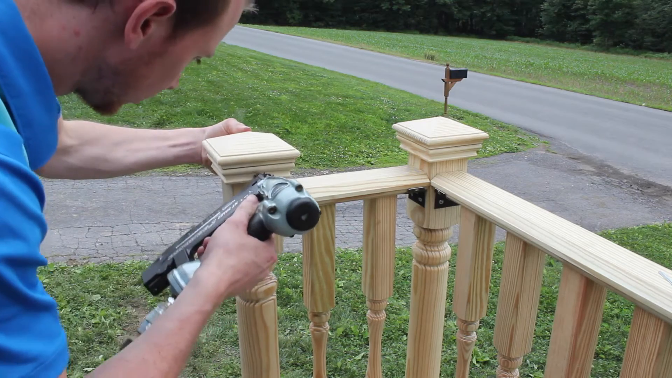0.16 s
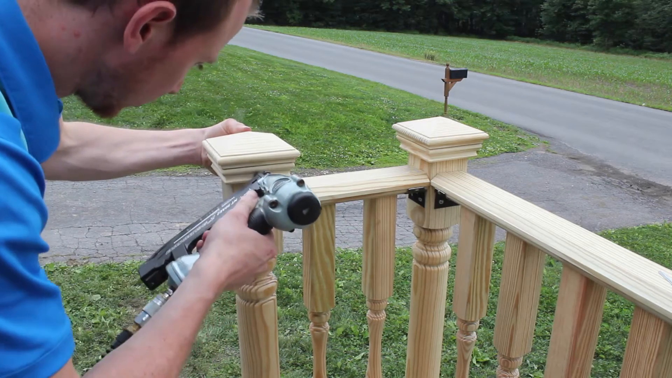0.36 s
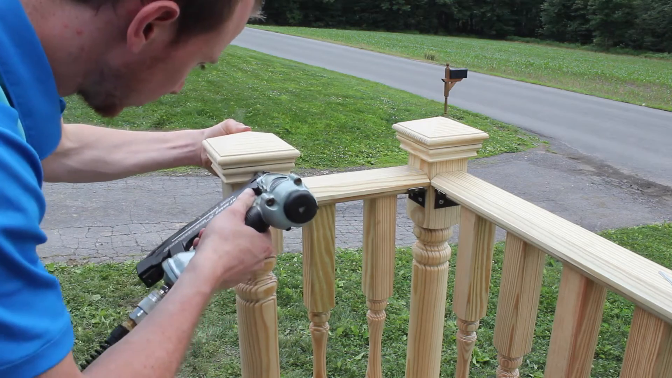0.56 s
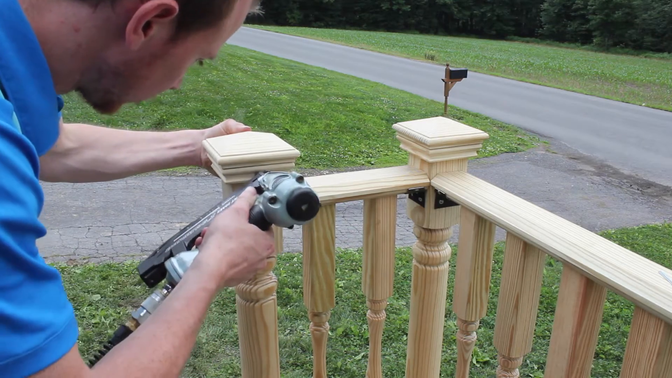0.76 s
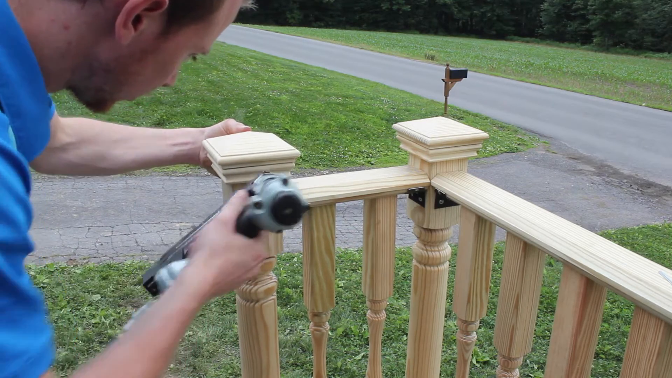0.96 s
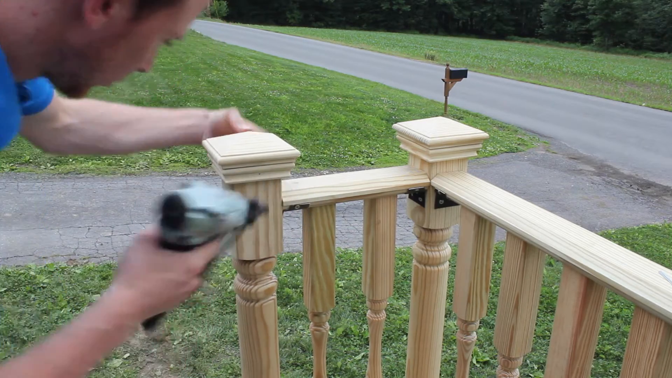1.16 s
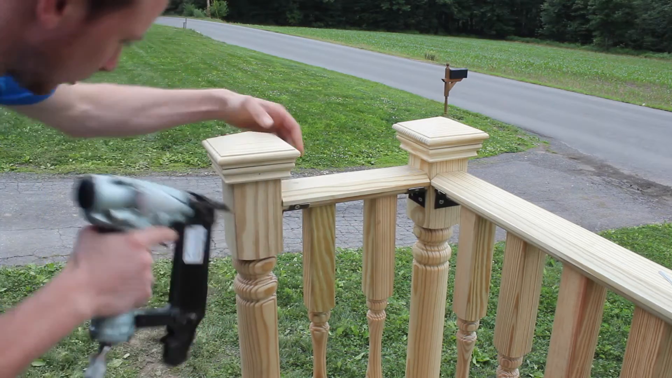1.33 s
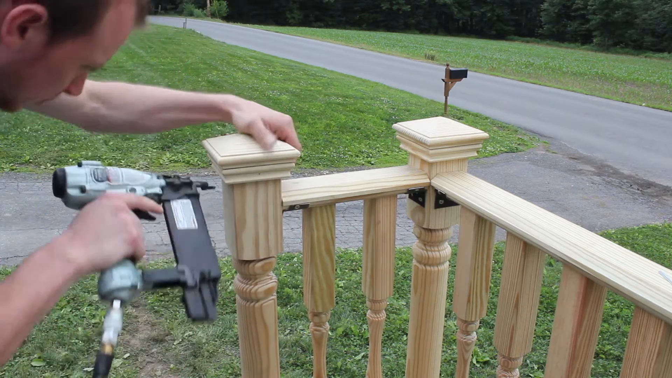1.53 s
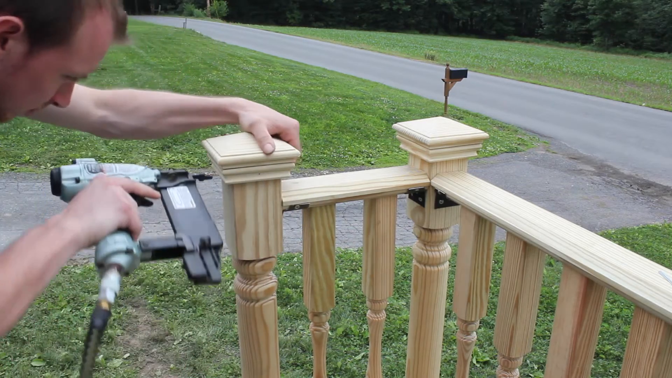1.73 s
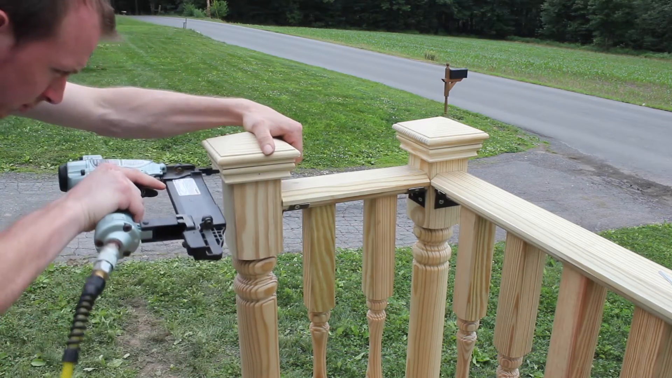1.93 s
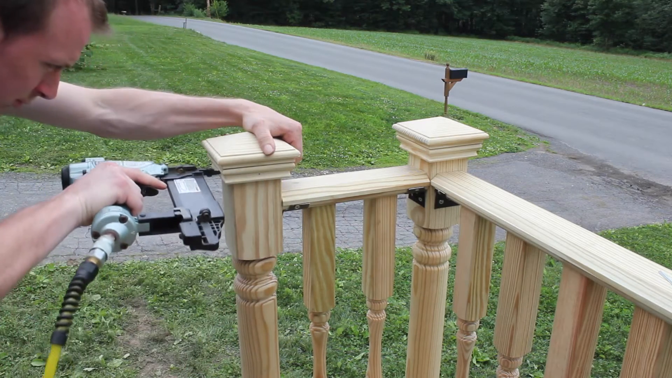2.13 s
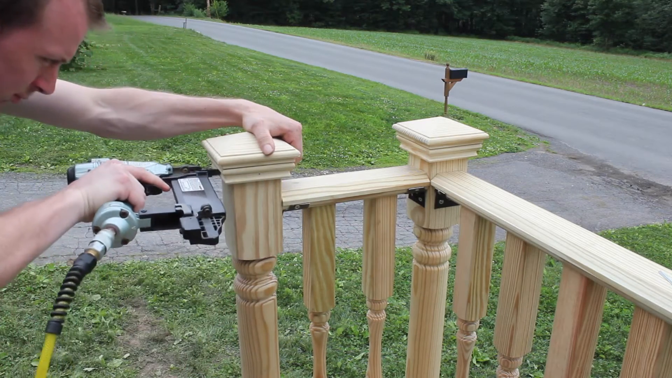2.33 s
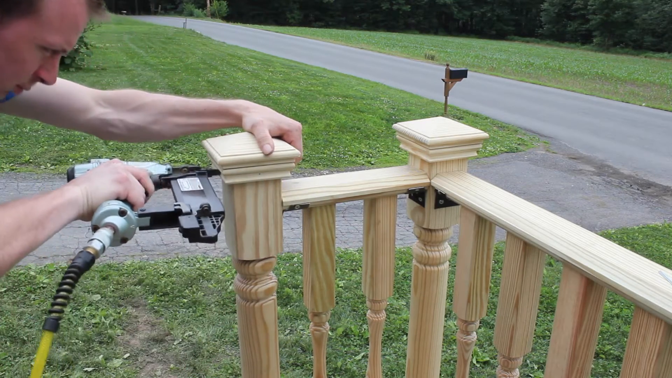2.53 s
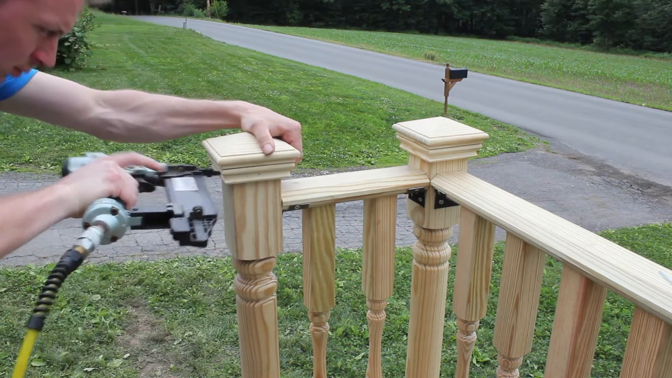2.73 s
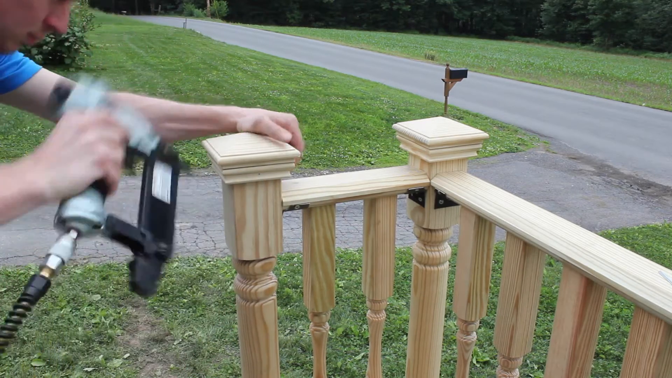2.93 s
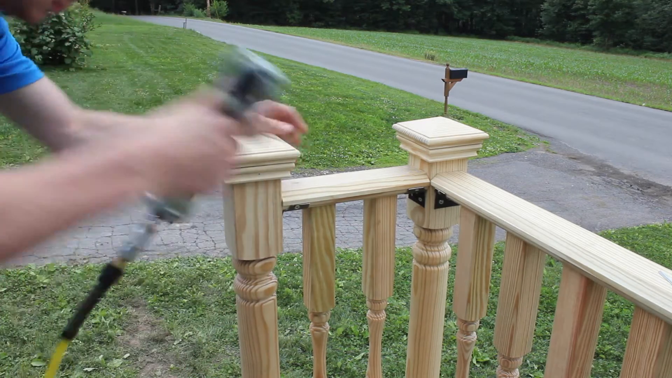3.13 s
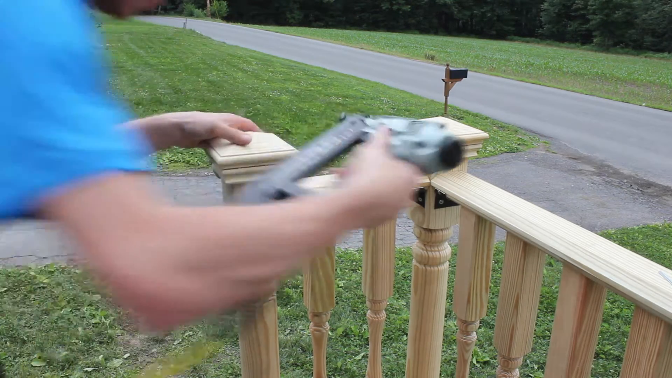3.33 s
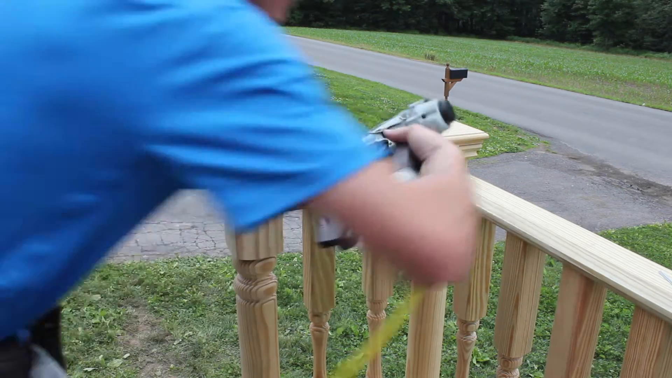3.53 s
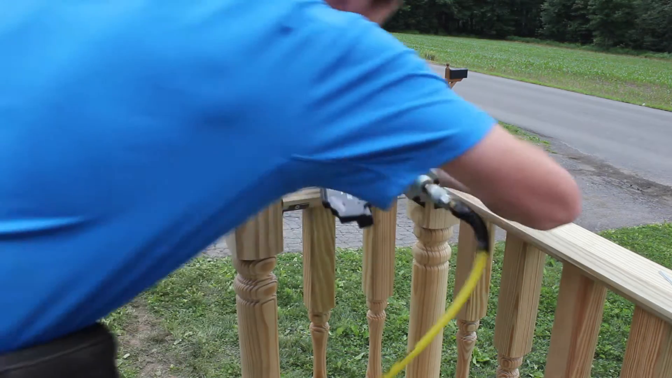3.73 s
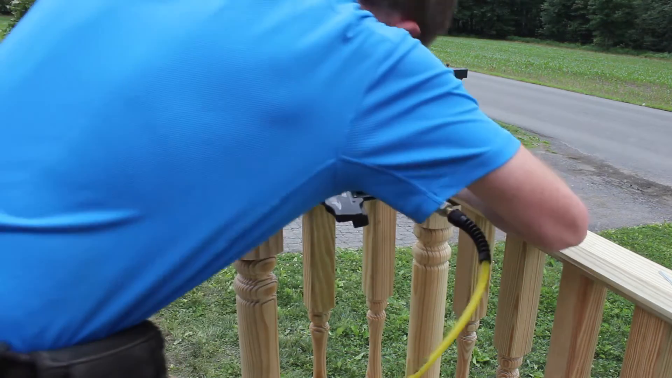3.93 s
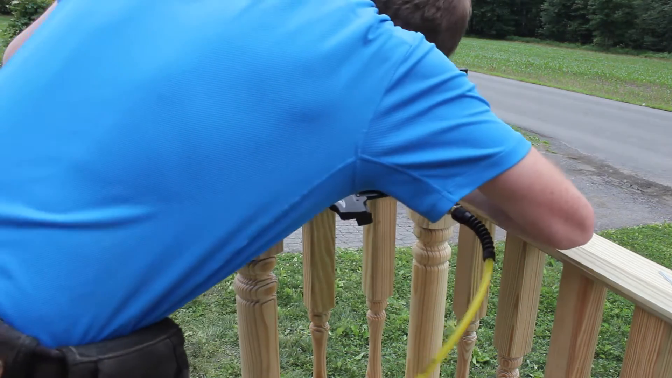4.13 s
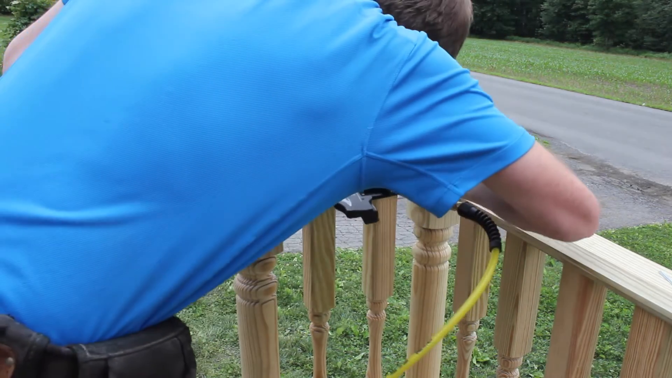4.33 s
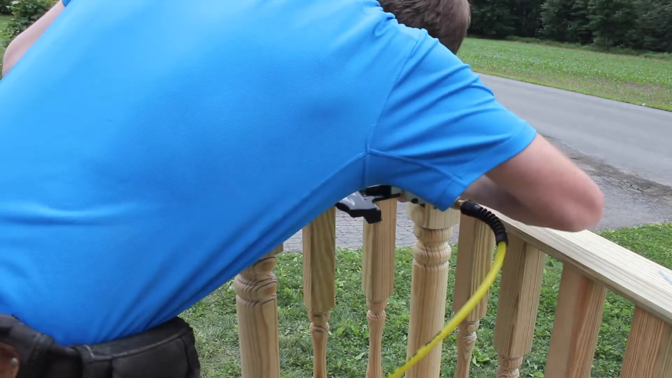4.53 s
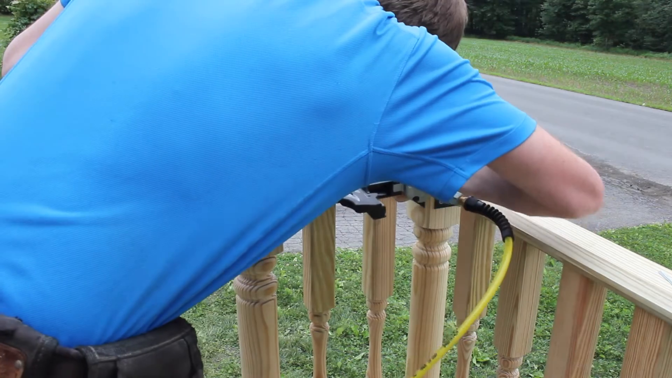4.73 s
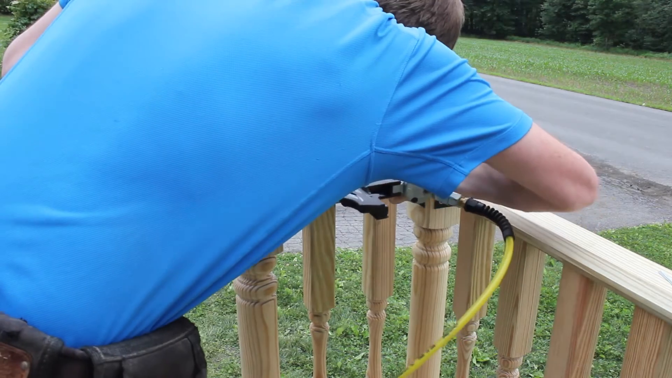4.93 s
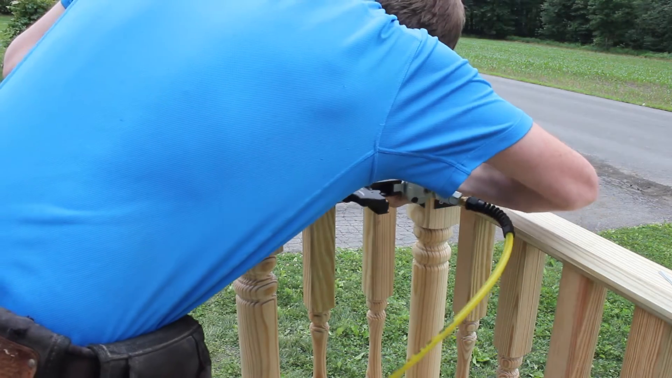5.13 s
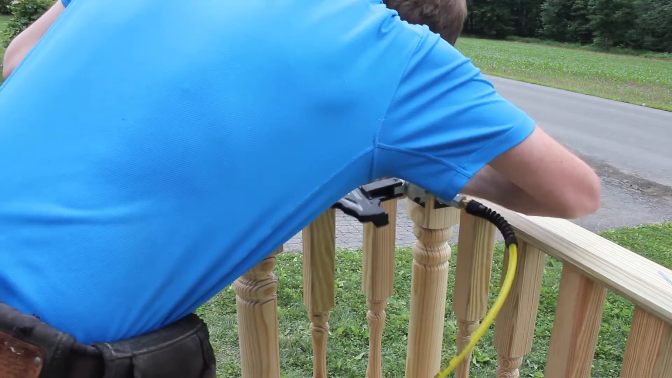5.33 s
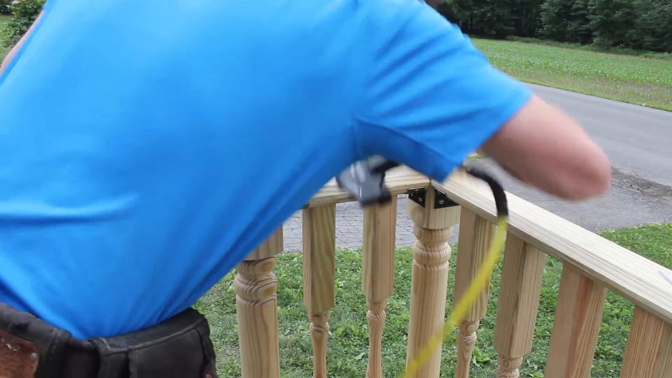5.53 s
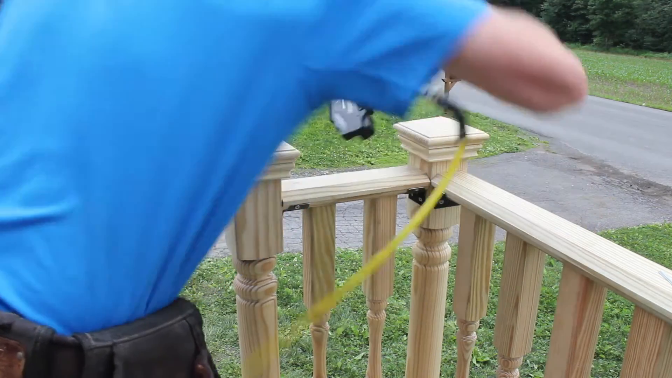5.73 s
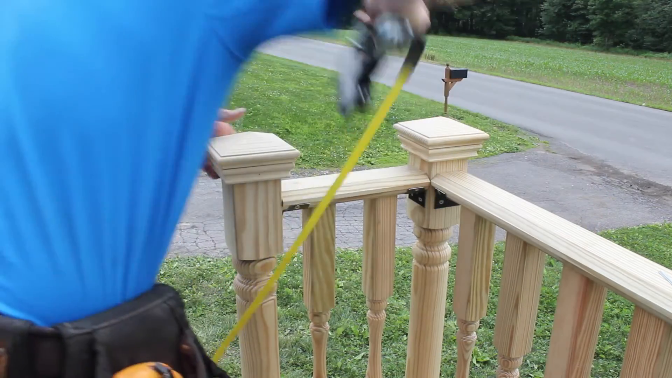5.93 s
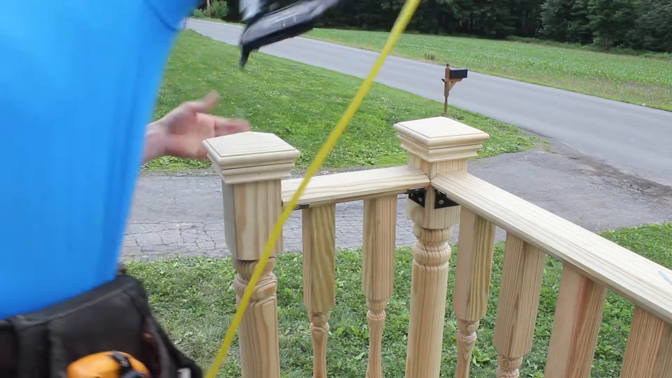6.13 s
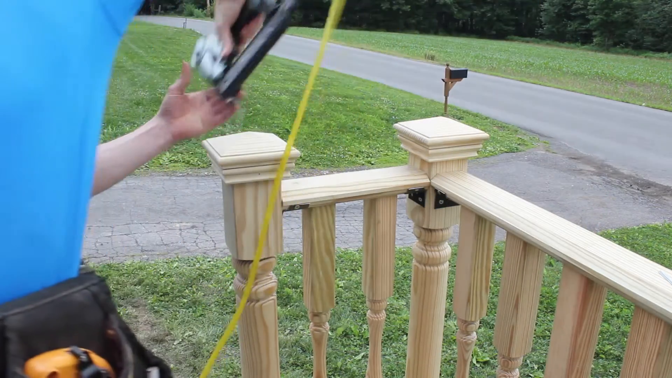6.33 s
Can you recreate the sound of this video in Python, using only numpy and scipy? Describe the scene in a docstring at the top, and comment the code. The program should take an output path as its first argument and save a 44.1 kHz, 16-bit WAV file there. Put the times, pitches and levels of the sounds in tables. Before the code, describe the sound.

Outdoors on a wooden porch, close and mono. Small clicks, a short squeak near 0.27 s and light scuffs open over barely audible leaves and low rumble. A puff of air at 0.78 leads to a very loud, dry crack at 0.87, with blast and thud, thin hiss and a valve clack at 1.0. From 1.15 to 1.35 the tool clicks, bumps and drags with a brief metallic ringing; fine clicks and scuffs follow at 1.9-2.4. The second, loudest shot cracks at 2.7, hissing out by 2.9. Light handling resumes at 3.2; a solid wooden knock lands at 3.8, a sharp click at 4.0, and smaller clicks at 4.6. A puff at 5.2 precedes the third shot at 5.3, with a heavier thud and clack at 5.46. Cloth brushes, a click at 5.94 and faint scuffs end it. Background dips after every shot.

```python
"""On a wooden porch outdoors, close to the microphone, a pneumatic stapler fixes trim to the rail.
Each of three shots joins a puff of air, the crack of the driver, a blast, a thud in the wood,
a hiss of exhaust and a valve clack: shaped noise, a short burst of sine and ringing modes.
Between shots the tool is shifted: it clicks, scuffs, squeaks, drags and bumps the rail.
Behind it lie a quiet garden and a low rumble; they and the low end of the shots dip after each shot."""
import sys
import numpy as np
from scipy import signal
from scipy.fft import rfft, irfft
from scipy.io import wavfile
from scipy.ndimage import uniform_filter1d

SR = 44100
rng = np.random.default_rng(int(sys.argv[2]) if len(sys.argv) > 2 else 0)


def materialize(psi):
    """Save the field psi as 16-bit PCM at rate SR to the path in sys.argv[1].

    A 1-D psi becomes a single channel; in a 2-D psi each row is a channel.
    """
    bounded = np.clip(np.atleast_2d(psi).T, -1, 1)
    quanta = np.round(bounded * 32767).astype(np.int16)
    wavfile.write(sys.argv[1], SR, quanta)


N = 285327
TOP_HZ = 15750  # upper limit of the recorded band
TIME = np.arange(N) / SR
AGE = TIME[:SR // 2]  # seconds since the start of one event

# The shots. Each row: start in seconds, crack level in dB, crack pitch in Hz, blast peak in seconds
# after the start, blast level in dB, thud in seconds after the start, thud level in dB,
# exhaust level in dB, exhaust length in seconds.
SHOT_ROWS = [(0.8747, -5, 2480, 0.025, -9.5, 0.028, -20, -32, 0.18),
             (2.7143, -2.5, 2564, 0.027, -10.5, 0.025, -21, -29.5, 0.17),
             (5.2923, -7.5, 2910, 0.025, -12.5, .0290, -13, -32.5, 0.17)]
# Ringing modes of the metal magazine. Each row: pitch in Hz, level in dB, 60 dB decay in seconds.
MAGAZINE_MODES = [(986.5, -6, 0.2), (1320, -16.5, 0.071), (1880, -11.5, 0.14), (2030, -7, 0.089),
                  (2410, -9.5, .17), (2650, -1.5, 0.28), (3010, -4, 0.16), (3720, -17, 0.38),
                  (4650, -9.5, 0.18), (4620, 2, 0.037), (6060, -14.5, 0.1), (8180, -13, 0.061),
                  (8850, -8, 0.037), (10280, -13.5, 0.053), (11730, -10.5, 0.031), (13550, -12, 0.046),
                  (14900, -65, 0.068)]
# Ringing modes of the wooden rail, before extra damping. Each row: pitch in Hz, level in dB,
# 60 dB decay in seconds.
RAIL_MODES = [(122.4, -9.5, 0.17), (232, -19.5, 0.037), (340, -3.5, 0.027), (430, -14.5, 0.17),
              (539, 1, 0.062), (607, -4, 0.18), (715, -7, 0.11), (830, -2, .06), (930, 0, 0.066),
              (1228, -3, 0.061), (1485, -5, 0.011), (1980, -16.5, 0.031)]
# Colour of rushing air. Each row: frequency in Hz, relative level in dB per Hz.
PUFF_COLOUR = [(60, -27.5), (200, -16), (600, -2), (1500, 0), (2800, 2), (5000, -2.5), (9000, -4),
               (15500, -4.5)]
# Colour of a blow on wood. Each row: frequency in Hz, relative level in dB per Hz.
THUD_COLOUR = [(60, -41.5), (180, -27.5), (330, -2.5), (550, -5), (1000, 6), (2400, 3), (4000, -13),
               (8000, -13), (15500, -20.5)]
# Colour of sliding contact. Each row: frequency in Hz, relative level in dB per Hz.
SCUFF_COLOUR = [(80, -62), (400, -38), (800, 0), (1700, 6.5), (2800, 5), (5000, -5.5), (8000, -12),
                (13000, -18), (15500, -22.5)]
# Colour of a bright tick. Each row: frequency in Hz, relative level in dB per Hz.
TICK_COLOUR = [(100, -32), (600, -18.5), (1400, 5.5), (3000, 1.5), (7500, 7.5), (10000, -2), (15500, -11.5)]
# Colour of the echoes, also of brushed cloth. Each row: frequency in Hz, relative level in dB per Hz.
ECHO_COLOUR = [(100, -19), (400, -11), (1000, -3), (2000, -6), (4000, -6), (8000, -5.5), (15500, -16)]


def stapler():
    """Three firing cycles: air arms the tool, the driver strikes, the cylinder vents, the valve shuts."""
    # Air puffs as the tool is armed. Each row: approximate peak in seconds, level in dB,
    # tilt in dB per octave.
    arming = [(0.775, -22.5, 1), (2.613, -24, 0), (5.203, -26, -0.5)]
    # The head valve shuts. Each row: start in seconds, level in dB.
    valve_shuts = [(1.011, -30.5), (2.818, -34), (5.457, -28)]
    out = np.zeros(N)
    for s, db, tilt_db in arming:
        add(out, s - 0.03, undb(db) * puff(tilt_db))
    for s, crack_db, hz, blast_s, blast_db, thud_s, thud_db, hiss_db, length_s in SHOT_ROWS:
        add(out, s, undb(crack_db) * crack(hz))
        add(out, s, undb(blast_db) * blast(blast_s))
        add(out, s, undb(hiss_db) * exhaust(length_s))
        add(out, s + thud_s, undb(thud_db) * thud())
    for s, db in valve_shuts:
        add(out, s, undb(db) * valve())
    return out


def crack(hz, push_s=0.00036, housing_db=-13, snap_db=-15):
    """The driver slams down: a few violent cycles, then the housing rings."""
    # Modes of the stapler housing. Each row: pitch in Hz, level in dB, 60 dB decay in seconds.
    housing_modes = [(1470, 4.5, 0.013), (2230, -9, 0.0047), (3050, 1.5, .016), (4170, -18.5, 0.0061)]
    push = AGE / push_s * np.exp(1 - AGE / push_s)
    cycles = push * (undb(snap_db) * noise(TICK_COLOUR) - np.sin(2 * np.pi * hz * AGE))
    housing = crest(ring(signal.unit_impulse(len(AGE)), housing_modes))
    onset = 1 - np.exp(-AGE / push_s)
    return cycles - undb(housing_db) * housing * onset


def blast(peak_s, leak_db=-17):
    """Air escapes ever faster while the piston travels, and stops when it seats, but for a fading leak."""
    # Colour of the blast. Each row: frequency in Hz, relative level in dB per Hz.
    blast_colour = [(60, -37), (300, -15), (700, -2), (2000, -6), (5000, -2.5), (9500, 1.5), (15500, 1)]
    flow = np.minimum(1.01 * swell(peak_s, 0.012, 0.0054), 1)
    leak = undb(leak_db) * noise(PUFF_COLOUR) * fade(0.03, peak_s)
    return noise(blast_colour, ripple_db=2) * flow + leak


def thud(wood_db=-12, seat_db=1, low_hz=340):
    """The piston bottoms out with a snap and the recoil shakes the wood; the lows are filtered out."""
    blow = noise(THUD_COLOUR, ripple_db=1) * fade(0.046)
    seat = undb(seat_db) * noise(PUFF_COLOUR) * fade(0.0016)
    wood = undb(wood_db) * crest(ring(signal.unit_impulse(len(AGE)), RAIL_MODES) * fade(0.08))
    return filtered(crest(blow) + seat + wood, low_hz, "high")


def exhaust(length_s, sag_db=-28, thin_t60=0.15, thin_hz=2800):
    """The cylinder vents; the hiss thins as the pressure falls, then closes (sag in dB per second)."""
    # Colour of the exhaust hiss. Each row: frequency in Hz, relative level in dB per Hz.
    exhaust_colour = [(60, -44.5), (300, -41.5), (600, -23.5), (1000, -25.5), (2000, -14.5), (4000, -8),
                      (7000, 0.5), (10000, -1.5), (13000, 4.5), (15500, -3.5)]
    full, thin = (noise(exhaust_colour, ripple_db=1.5) for _ in range(2))
    pressure = fade(thin_t60)
    hiss = pressure * full + (1 - pressure) * filtered(thin, thin_hz, "high")
    opening = np.minimum(AGE / 0.025, 1)
    return hiss * undb(sag_db * AGE) * fade(0.1, length_s) * opening


def puff(tilt_db, lead_s=0.031, width_s=0.014, linger_db=-15, fill_db=-27):
    """Air rushes through the trigger valve, then trickles on until the shot."""
    rush = np.exp(-((AGE - lead_s) / width_s) ** 2 / 2)
    flow = rush + undb(linger_db) * fade(0.041, lead_s)
    opening = np.minimum(1, np.exp((AGE - lead_s + 0.0135) / 0.002))
    trickle = undb(fill_db) * noise(SCUFF_COLOUR) * fade(0.1, 0.13)
    return (noise(PUFF_COLOUR, tilt_db, ripple_db=2) * flow + trickle) * opening


def valve(bounce_s=0.0039):
    """The piston returns and the head valve shuts with a short double clack."""
    # Colour of the valve clack. Each row: frequency in Hz, relative level in dB per Hz.
    valve_colour = [(300, -125), (900, -17.5), (1800, -4.5), (3000, -4), (5500, -6.5), (9000, -11.5),
                    (15500, -24)]
    bounce = undb(-18.5) * (AGE > bounce_s) * fade(0.037, bounce_s)
    onset = 1 - np.exp(-AGE / 0.00087)
    return noise(valve_colour, ripple_db=4) * (fade(0.081) + bounce) * onset


def bumps(contact_db=-1, scrape_db=-22, firm=0.35, damping=30, tail_db=-24):
    """The tool bumps the rail: noisy contact and a knock ring the wood; shorter swells damp it sooner."""
    # Bumps against the rail. Each row: peak in seconds, level in dB, swell length scale in seconds,
    # low-pass corner in Hz.
    rail_contacts = [(0.339, -43.5, 0.01, 2000), (1.148, -35.5, 0.0056, 703), (1.166, -31.5, .02, 600),
                     (1.325, -37, .016, 230), (1.738, -47, 0.0062, 1500), (3.314, -49, .01, 349),
                     (3.768, -37, 0.0023, 990), (3.791, -21, 0.0062, 1402), (3.799, -18, 0.011, 480),
                     (3.830, -28, 0.02, 260), (3.884, -46, .015, 1200), (3.934, -34.5, .011, 1200),
                     (5.818, -57.5, 0.0039, 817), (5.999, -49, .008, 1800), (6.408, -45, 0.014, 1770)]
    out = np.zeros(N)
    for s, db, swell_s, hz in rail_contacts:
        lead_s = 0.97 * swell_s
        tail = undb(tail_db) * (AGE > lead_s) * fade(0.25, lead_s)
        rise = swell(lead_s, 1.1 * swell_s, 0.0066) + tail
        contact = filtered(noise(THUD_COLOUR) * rise, 200, "high")
        knock = firm * np.exp(-((AGE - lead_s) / 0.00005) ** 2)
        force = contact / np.linalg.norm(contact) + knock
        wood = filtered(ring(force, RAIL_MODES), 160, "high") * fade(damping * swell_s, lead_s)
        body = crest(wood) + undb(contact_db) * crest(contact)
        scrape = undb(scrape_db) * noise(SCUFF_COLOUR) * rise
        add(out, s - lead_s, undb(db) * (crest(filtered(body, hz, "low")) + scrape))
    return out


def clicks(spread=1.22, metal_db=-33, t60=0.027, bounce_db=-11, bounce_s=0.0063):
    """Small parts snap home and bounce once: a short ring, a bright tick and a trace of the magazine."""
    # Latch and magazine clicks. Each row: start in seconds, level in dB, ring pitch in Hz,
    # bright tick in dB against the ring.
    latch_snaps = [(0.031, -27.5, 2220, -2.5), (0.152, -55.5, 3800, -8), (0.377, -37.5, 2150, -20),
                   (1.16, -30.5, 1890, -27), (1.295, -28.5, 2180, -11), (1.925, -40.5, 3240, -44.5),
                   (2, -35, 1660, -34), (2.064, -33, 3360, -26), (2.073, -30.5, 5350, 16),
                   (2.219, -36, 6140, 16), (2.316, -26.5, 4650, 2), (2.359, -33.5, 5110, 7),
                   (3.284, -39.5, 4170, -7), (3.401, -45.5, 2760, -28), (3.491, -41.5, 3250, -12),
                   (3.589, -40.5, 8480, -22.5), (3.983, -21, 2720, -4.5), (3.985, -22.5, 1360, -31),
                   (4.119, -35.5, 5900, -8), (4.158, -37.5, 6600, -7.5), (4.162, -34, 2850, -12.5),
                   (4.363, -48, 7400, -13), (4.602, -27.5, 3180, -3.5), (4.610, -33, 1720, -4.5),
                   (4.677, -32.5, 4570, 2.5), (4.902, -41.5, 2480, 0.5), (5.944, -26, 3220, -11),
                   (6.151, -55.5, 9400, -6), (6.225, -52.5, 4590, 11), (6.385, -40.5, 5480, -7)]
    strikes = fade(t60) + undb(bounce_db) * (AGE > bounce_s) * fade(t60, bounce_s)
    out = np.zeros(N)
    for s, db, hz, tick_db in latch_snaps:
        tick, rattle = (noise(TICK_COLOUR, ripple_db=5) for _ in range(2))
        part = unit(filtered(rattle, [hz / spread, hz * spread], "band"))
        click = crest((part + undb(tick_db) * tick) * strikes)
        metal = undb(metal_db) * crest(ring(click, MAGAZINE_MODES))
        add(out, s, undb(db) * (click + metal))
    return out


def drag(ring_db=-28, grain_db=4, size=120, low_hz=750, touch_s=0.015, grip_s=1.364, grip_t60=0.2):
    """Friction bows the magazine in small slips; it catches a few times and rings until the hand damps it."""
    # The magazine catches on the edge of the post. Each row: start in seconds, level in dB.
    edge_catches = [(1.294, -38), (1.317, -26), (1.3229, -22.5), (1.353, -42)]
    first_touch_s, free_s = 1.238, 1.328  # pressure builds from first touch until it slips free
    slips = undb(grain_db * flutter(len(AGE), size))
    pressure = swell(free_s - first_touch_s, 0.036, 0.018) * np.minimum(AGE / touch_s, 1)
    friction = pressure * slips * rng.standard_normal(len(AGE))
    out = np.zeros(N)
    add(out, first_touch_s, undb(ring_db) * crest(ring(friction, MAGAZINE_MODES)))
    for s, db in edge_catches:
        add(out, s, undb(db) * crest(ring(signal.unit_impulse(len(AGE)), MAGAZINE_MODES)))
    grip = undb(-60 * np.maximum(TIME - grip_s, 0) / grip_t60)
    return filtered(out, low_hz, "high") * grip


def nose():
    """The sprung safety nose flies out against its stop and rings."""
    # Modes of the safety nose. Each row: pitch in Hz, level in dB, 60 dB decay in seconds.
    nose_modes = [(3244, 10, 0.042), (4300, -17.5, .08), (5170, -5, 0.036), (6580, 7, .05),
                  (6400, -8, 0.084), (7900, -5, 0.05), (9850, 7.5, 0.039), (12650, -4, 0.098),
                  (14400, -16.5, 0.046)]
    # The nose springs out. Each row: start in seconds, level in dB.
    spring_outs = [(1.161, -30.5), (3.588, -59), (4.12, -43.5)]
    out = np.zeros(N)
    for s, db in spring_outs:
        add(out, s, undb(db) * crest(ring(noise(TICK_COLOUR) * fade(0.051), nose_modes)))
    return out


def squeaks(waver=0.018, size=200):
    """Stick and slip of tool and hose locks into a brief gliding tone with overtones."""
    # Squeaks. Each row: start in seconds, length in seconds, start pitch in Hz, end pitch in Hz,
    # level in dB, change of the overtones in dB per octave.
    gliding_tones = [(0.239, 0.06, 3990, 3930, -47, -25), (0.273, 0.027, 2097, 2288, -25, -14.5),
                     (0.542, 0.23, 8120, 8220, -70.5, -43), (1.244, 0.012, 1390, 1340, -36.5, -11),
                     (1.296, 0.05, 985, 965, -39, -30), (1.928, 0.012, 2280, 2280, -46, -36),
                     (2.18, 0.022, 2470, 2390, -47.5, -17), (3.665, 0.017, 12200, 12300, -65, -12)]
    out = np.zeros(N)
    for s, length_s, start_hz, end_hz, db, fall_db in gliding_tones:
        glide = np.interp(AGE, [0, length_s], [start_hz, end_hz])
        hz = glide * (1 + waver * flutter(len(AGE), size))
        phase = 2 * np.pi * np.cumsum(hz) / SR
        overtones = [k for k in range(1, 6) if k * end_hz < TOP_HZ]
        tone = sum(undb(fall_db * np.log2(k)) * np.sin(k * phase) for k in overtones)
        envelope = np.minimum(AGE / 0.004, 1) * fade(0.035, 0.85 * length_s)
        add(out, s, undb(db) * unit(tone) * envelope)
    return out


def scuffs(grain_db=2.5, colour_db=4, size=160, count=3):
    """Short slides on wood and hand catch and slip, with a few drifting resonances at the contact point."""
    # Slides. Each row: start in seconds, length in seconds, level in dB, tilt in dB per octave.
    slides = [(0.0, 0.004, -37.5, 0.5), (0.307, 0.023, -35.5, 0), (0.375, 0.046, -47.5, 5.5),
              (0.421, 0.034, -40, 4), (1.175, 0.063, -46, -5), (1.225, 0.13, -43.5, 1.5),
              (1.725, 0.03, -43.5, 6.5), (1.963, 0.039, -45, 0.5), (2.018, 0.03, -40, 2),
              (2.099, 0.032, -46.5, 3), (2.147, 0.051, -42.5, 4.5), (2.293, 0.076, -45.5, 1.5),
              (3.22, 0.078, -48, 4), (3.346, 0.028, -51.5, 11), (3.772, 0.0077, -41, 0.5),
              (3.917, 0.013, -37, 5.5), (4.204, 0.029, -45.5, 5), (4.364, 0.012, -50.5, 5),
              (4.573, 0.064, -45, 2.5), (4.8, 0.0088, -59.5, 11), (5.582, 0.061, -59, 6.5),
              (5.763, 0.047, -47.5, 1), (5.888, 0.036, -43, 2), (6.251, 0.023, -52, 6),
              (6.385, 0.054, -51, 3.5)]
    out = np.zeros(N)
    for s, length_s, db, tilt_db in slides:
        grip = undb(grain_db * flutter(len(AGE), size))
        whistles = undb(-10) * sum(chirr() for _ in range(count))
        slide = noise(SCUFF_COLOUR, tilt_db, colour_db) + whistles
        envelope = (1 - np.exp(-AGE / 0.003)) * fade(0.13, length_s)
        add(out, s, undb(db) * unit(slide * grip) * envelope)
    return out


def chirr(low_hz=1600, high_hz=6500, width_hz=70, glide=3):
    """A rough, narrow friction resonance that drifts in pitch, by up to glide octaves per second."""
    start_hz = low_hz * (high_hz / low_hz) ** rng.random()
    hz = start_hz * 2 ** (glide * rng.uniform(-1, 1) * AGE)
    roughness = filtered(rng.standard_normal(len(AGE)), width_hz, "low")
    return unit(roughness * np.sin(2 * np.pi * np.cumsum(hz) / SR))


def rustle(low_hz=1350, high_hz=2600, grain_db=3.5, shift_db=5, size=1800, snag_db=4, grain_size=40):
    """Cloth and hose brush as the arm moves; dull and bright parts flutter apart, and fibres snag."""
    # Arm movements. Each row: peak in seconds, level in dB, rise in seconds, fall in seconds.
    arm_moves = [(0.02, -56.5, .05, 0.085), (1.29, -46, .035, 0.11), (2.15, -66, .1, 0.13),
                 (3.22, -58, 0.076, 0.43), (3.95, -58, .06, 0.088), (5.66, -55, 0.13, 0.21),
                 (5.95, -50, 0.088, 0.046)]
    brush = unit(filtered(noise(ECHO_COLOUR, size=N), [low_hz, high_hz], "band"))
    snags = undb(snag_db * flutter(N, grain_size))
    fibres = undb(-8) * unit(noise(SCUFF_COLOUR, tilt_db=2.5, ripple_db=2.5, size=N) * snags)
    dull = brush * undb(grain_db * flutter(N, size))
    bright = fibres * undb(shift_db * flutter(N, size))
    speed = sum(undb(db) * swell(s, rise_s, fall_s, TIME) for s, db, rise_s, fall_s in arm_moves)
    return unit(dull + bright) * speed


def garden(level_db=-73.5, waver_db=0.5, size=5000):
    """Faint leaves and a distant rumble: steady coloured noise, gently wavering, that dips after shots."""
    # Colour of the garden. Each row: frequency in Hz, relative level in dB per Hz.
    garden_colour = [(25, -17.5), (60, -5.5), (110, 6), (170, 4.5), (300, -7), (600, 2), (1000, 1),
                     (1900, 0), (4000, -5), (8000, -11), (12000, -15), (15500, -22.5)]
    return noise(garden_colour, size=N) * undb(level_db + waver_db * flutter(N, size)) * dip()


def rumble(low_hz=95, high_hz=200):
    """Low-pitched noise swells and ebbs softly, and dips after shots."""
    # Swells, before the dip. Each row: peak in seconds, level in dB, width in seconds.
    low_swells = [(1.898, -72.5, 0.42), (3.7, -71.5, 0.24), (6.299, -76, .3)]
    flow = sum(undb(db) * np.exp(-((TIME - s) / width_s) ** 2 / 2) for s, db, width_s in low_swells)
    return unit(filtered(rng.standard_normal(N), [low_hz, high_hz], "band")) * flow * dip()


def yard(x, porch_db=-17, porch_t60=0.071, far_db=-26, far_t60=0.3):
    """Scatter from porch and house wall and a weaker outdoor tail: decaying noise added as echoes."""
    near, far = (noise(ECHO_COLOUR) * fade(t60) * np.minimum(AGE / 0.024, 1)
                 for t60 in (porch_t60, far_t60))
    porch = undb(porch_db) * near / np.linalg.norm(near)
    distance = undb(far_db) * far / np.linalg.norm(far)
    return x + signal.fftconvolve(x, porch + distance)[:N]


def dip(depth_db=-27, delay_s=0.019, attack_s=0.17, hold_s=0.074, recovery_s=0.19):
    """Gain that sinks after each shot, holds and recovers."""
    corners = np.cumsum([delay_s, attack_s, hold_s, recovery_s])
    return undb(depth_db * sum(np.interp(TIME - shot[0], corners, [0, 1, 1, 0]) for shot in SHOT_ROWS))


def thinned(x, below_hz=1050):
    """The low end of a sound sinks with the dip."""
    lows = signal.sosfiltfilt(signal.butter(4, below_hz, "low", fs=SR, output="sos"), x)
    return x - lows * (1 - dip())


def undb(db):
    """Decibels to gain."""
    return 10 ** (np.asarray(db) / 20)


def unit(x):
    """Scale to rms 1."""
    return x / np.sqrt(np.mean(x ** 2))


def crest(x, size=128):
    """Scale so that the loudest three milliseconds have rms 1."""
    return x / np.sqrt(uniform_filter1d(x ** 2, size).max())


def add(track, s, sound):
    """Mix a sound into the track at a time in seconds."""
    start = max(int(s * SR), 0)
    track[start:start + len(sound)] += sound[:N - start]


def flutter(length, size):
    """Slow random wandering of rms 1: noise averaged over size samples."""
    return unit(uniform_filter1d(rng.standard_normal(length), size))


def noise(spectrum, tilt_db=0, ripple_db=0, size=len(AGE)):
    """Noise of a given colour at rms 1; the ripple makes the spectrum uneven, drawn anew for each sound."""
    hz = np.fft.rfftfreq(size, 1 / SR) + 1  # keeps the logarithm finite
    points, levels = np.transpose(spectrum)
    db = np.interp(np.log(hz), np.log(points), levels)
    db += tilt_db * np.log2(np.maximum(hz, 500) / 2000)  # no further tilt below 500 Hz
    grid = np.arange(0, SR / 2, 170)  # ripple spacing in Hz
    db += ripple_db * np.interp(hz, grid, rng.standard_normal(len(grid)))
    return unit(irfft(rfft(rng.standard_normal(size)) * undb(db), size))


def fade(t60, after=0):
    """Steady until a moment, then an exponential decay of 60 dB in t60 seconds."""
    return undb(-60 * np.maximum(AGE - after, 0) / t60)


def swell(peak_s, rise_s, fall_s, t=AGE):
    """Exponential rise to a peak and fall from it."""
    return np.exp(np.minimum((t - peak_s) / rise_s, (peak_s - t) / fall_s))


def ring(push, modes):
    """A body's damped modes, driven by a force."""
    response = sum(undb(db) * fade(t60) * np.sin(2 * np.pi * hz * AGE) for hz, db, t60 in modes)
    return signal.fftconvolve(push, response)[:len(push)]


def filtered(x, hz, kind):
    """Second-order Butterworth low-, high- or band-pass."""
    return signal.sosfilt(signal.butter(2, np.clip(hz, 20, TOP_HZ), kind, fs=SR, output="sos"), x)


def scene():
    """Shots and handling on the porch, over the garden; the low end of the shots dips after each one."""
    shots = thinned(yard(stapler(), porch_db=-26, porch_t60=0.43, far_db=-38, far_t60=0.3))
    handling = yard(bumps() + clicks() + drag() + nose() + squeaks() + scuffs() + rustle())
    return (shots + handling + garden() + rumble())[None]  # one channel


def record(dry, wind_cut_hz=95):
    """The recorder filters out the deep bass, stops at full scale and cuts the top."""
    clipped = np.clip(filtered(dry, wind_cut_hz, "high"), -1, 1)
    return signal.sosfilt(signal.ellip(8, 0.2, 70, TOP_HZ, fs=SR, output="sos"), clipped)


dry = scene()
out = record(dry)
materialize(out)
```